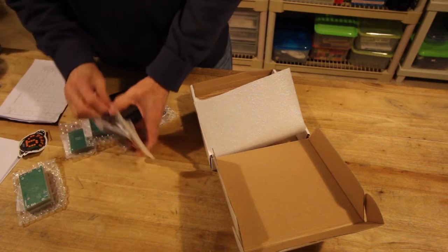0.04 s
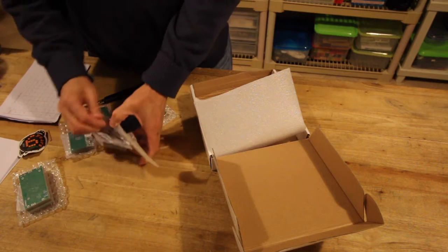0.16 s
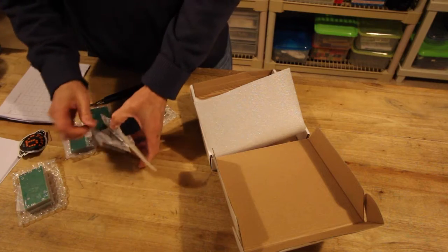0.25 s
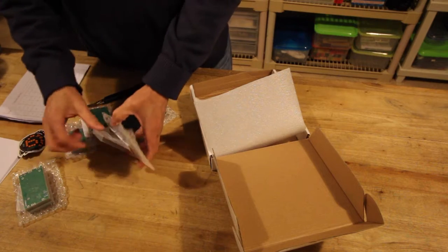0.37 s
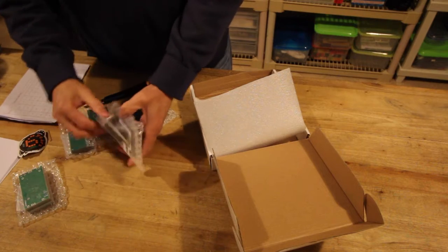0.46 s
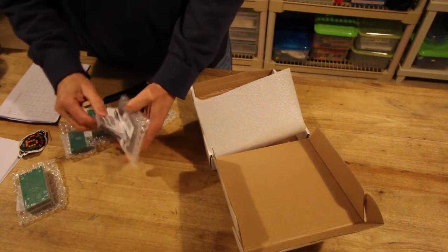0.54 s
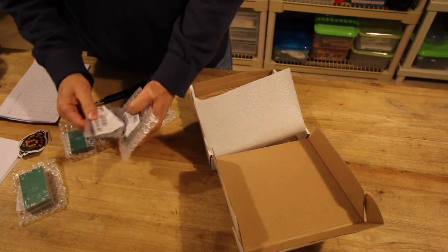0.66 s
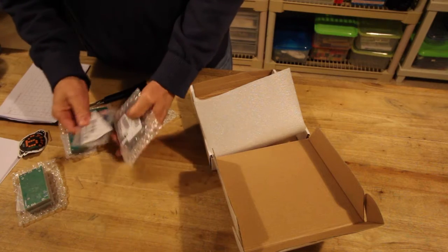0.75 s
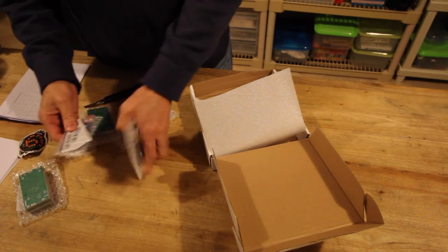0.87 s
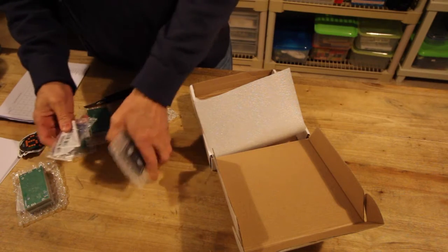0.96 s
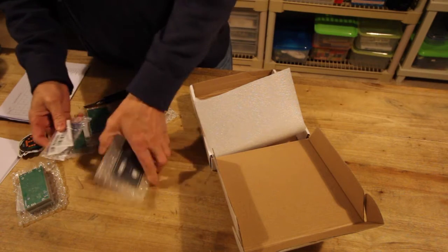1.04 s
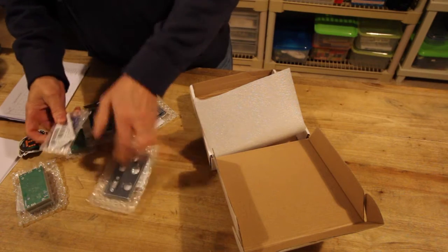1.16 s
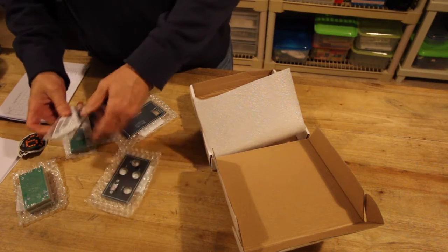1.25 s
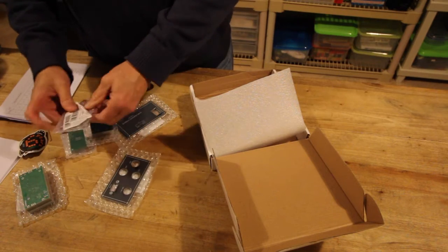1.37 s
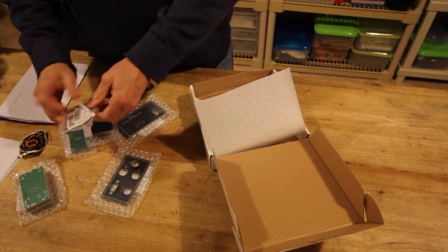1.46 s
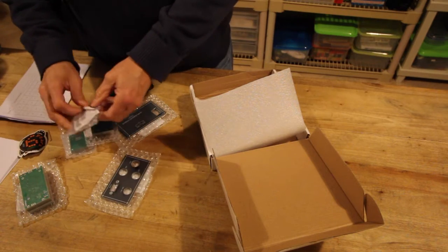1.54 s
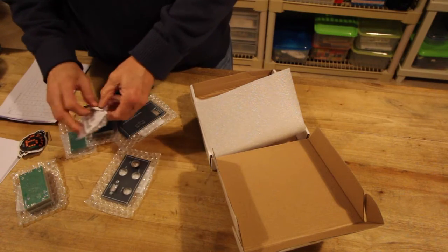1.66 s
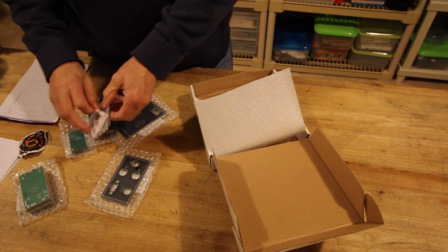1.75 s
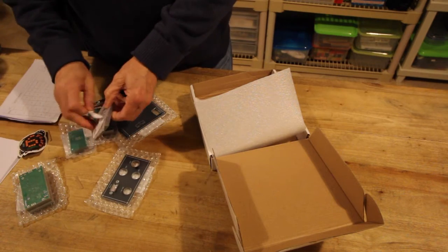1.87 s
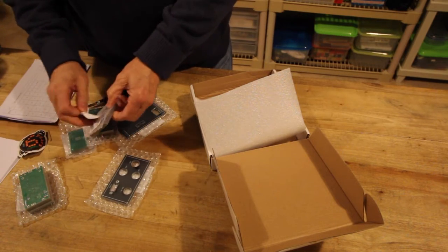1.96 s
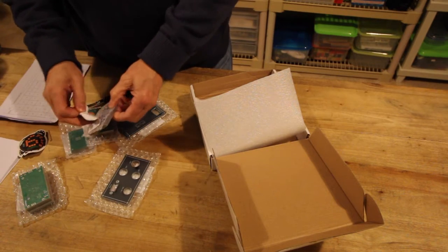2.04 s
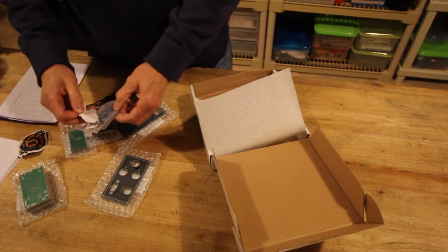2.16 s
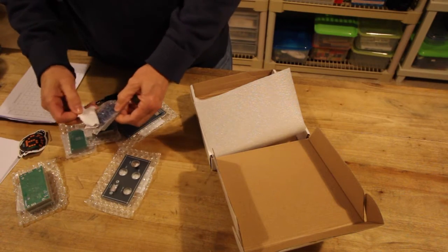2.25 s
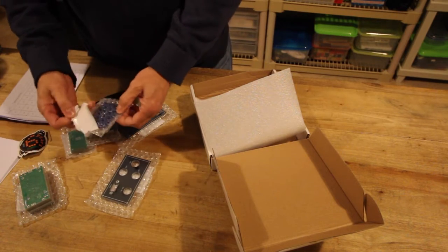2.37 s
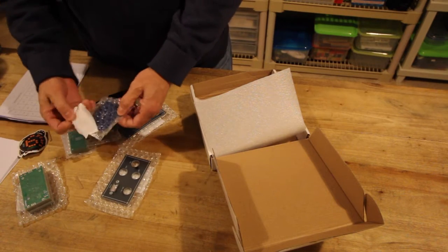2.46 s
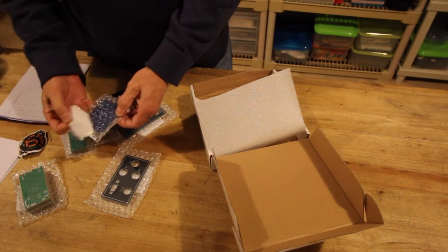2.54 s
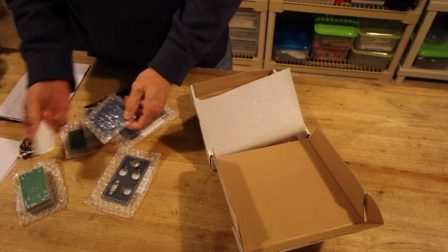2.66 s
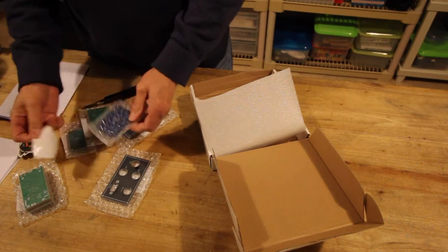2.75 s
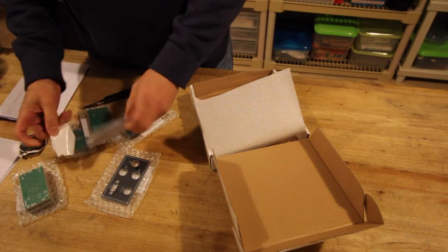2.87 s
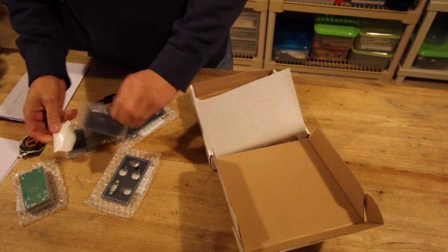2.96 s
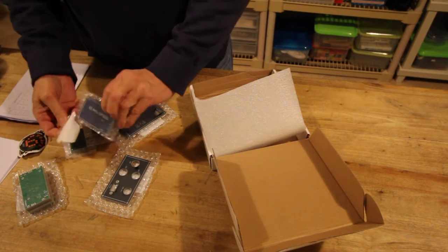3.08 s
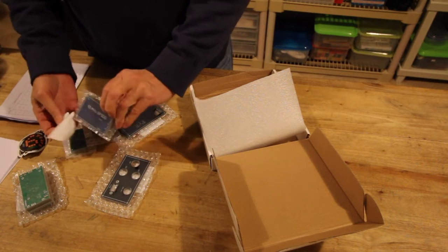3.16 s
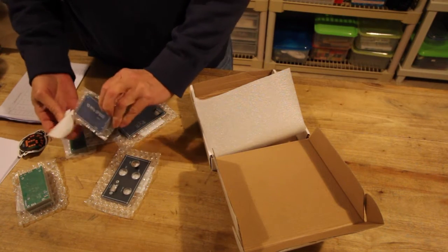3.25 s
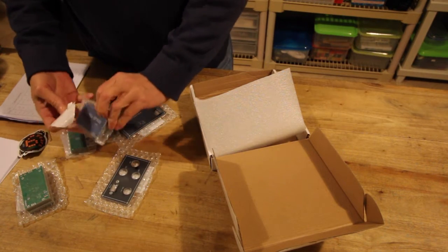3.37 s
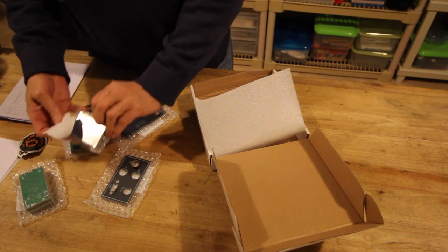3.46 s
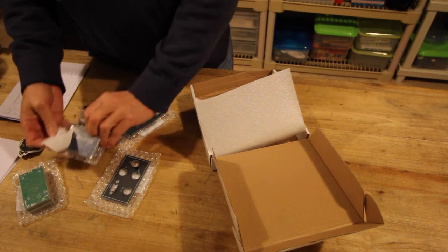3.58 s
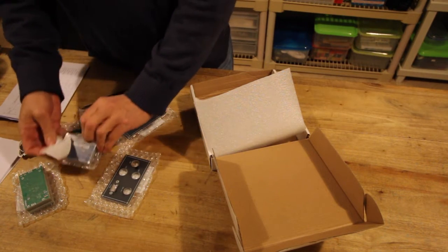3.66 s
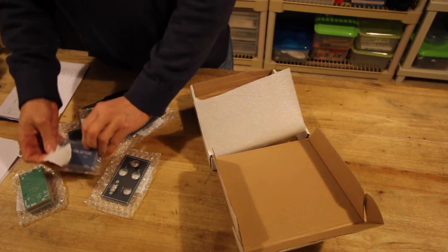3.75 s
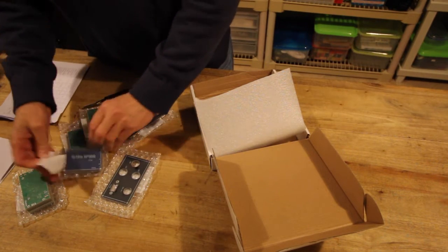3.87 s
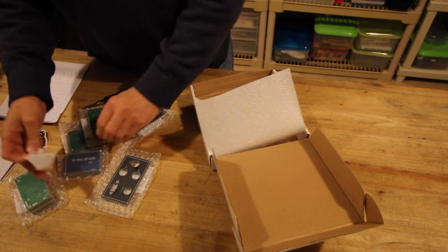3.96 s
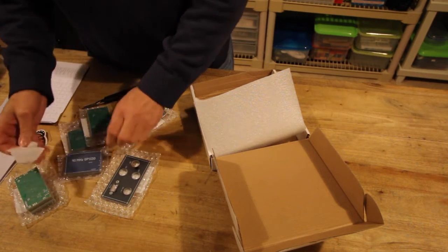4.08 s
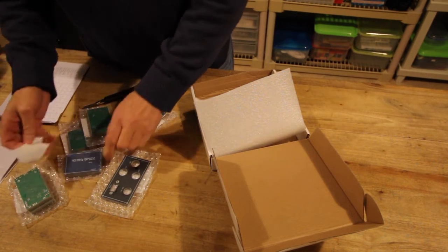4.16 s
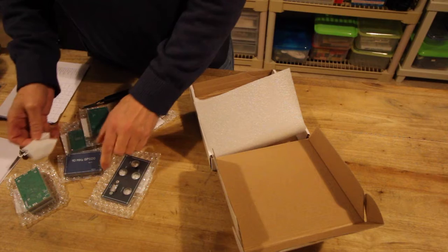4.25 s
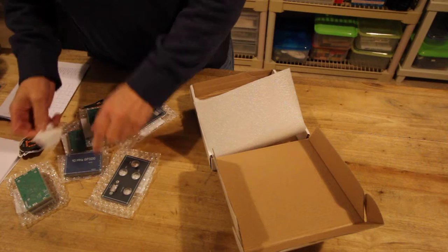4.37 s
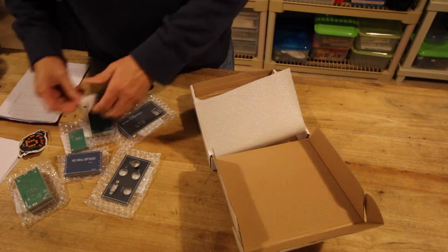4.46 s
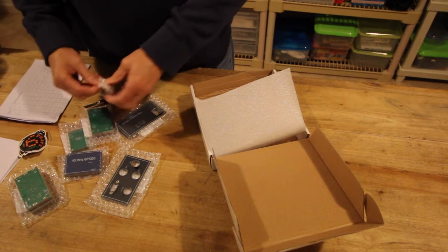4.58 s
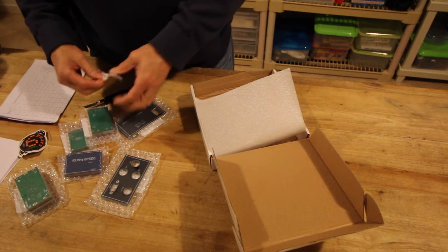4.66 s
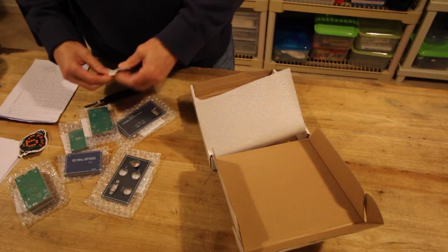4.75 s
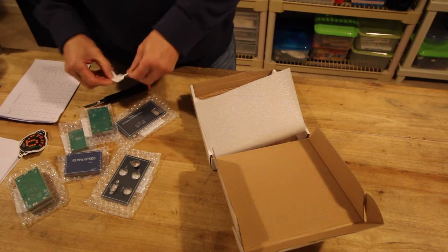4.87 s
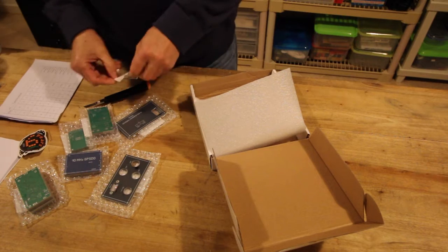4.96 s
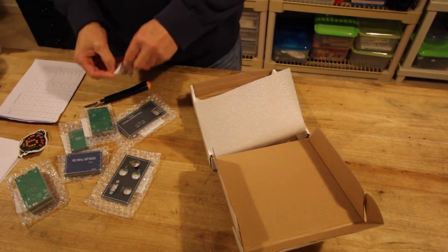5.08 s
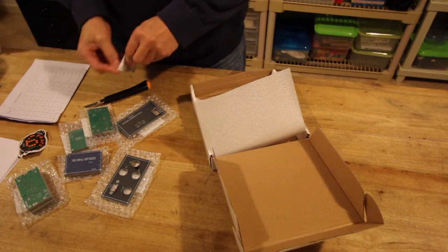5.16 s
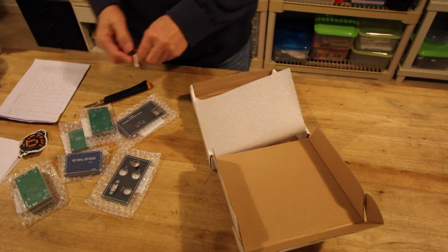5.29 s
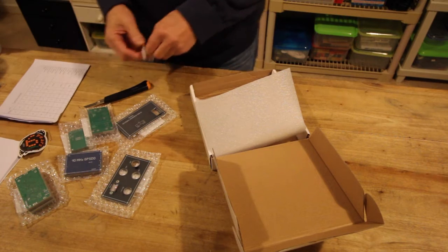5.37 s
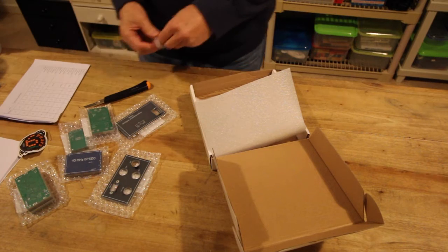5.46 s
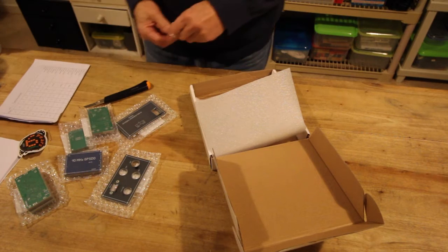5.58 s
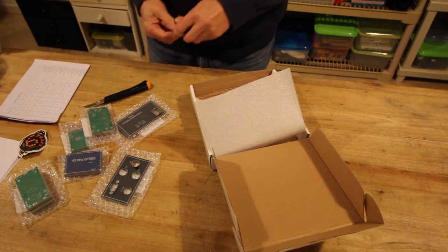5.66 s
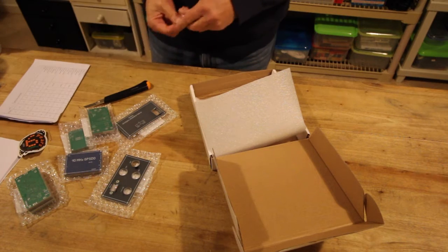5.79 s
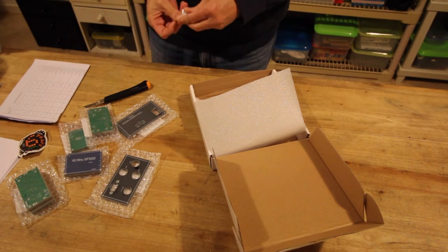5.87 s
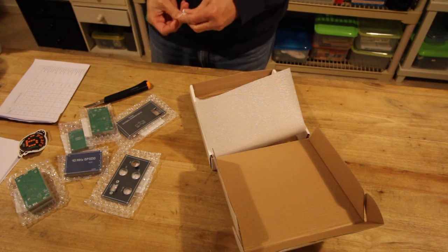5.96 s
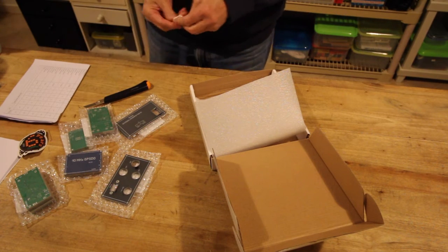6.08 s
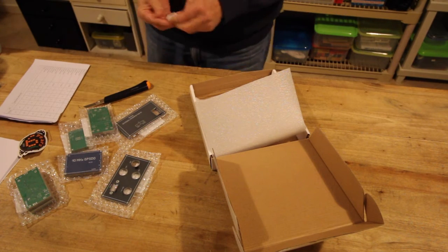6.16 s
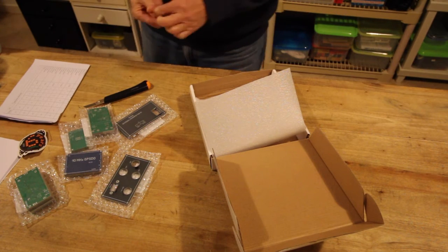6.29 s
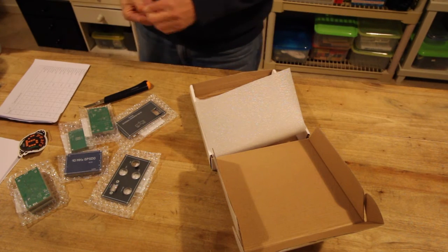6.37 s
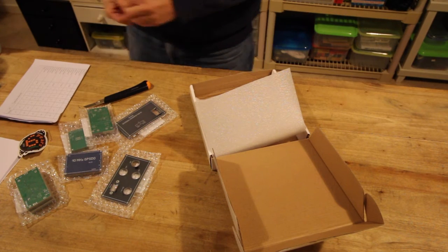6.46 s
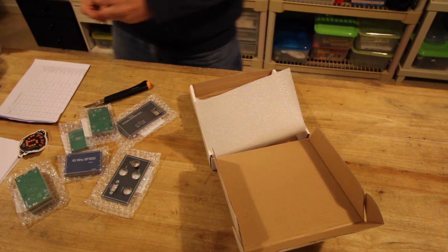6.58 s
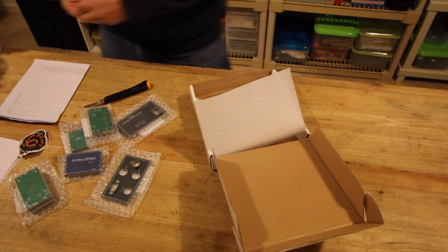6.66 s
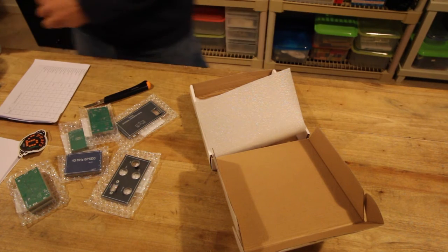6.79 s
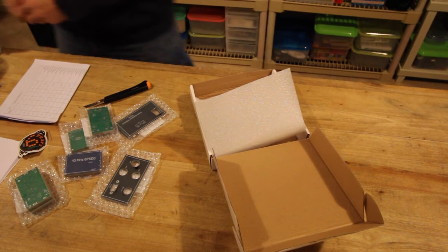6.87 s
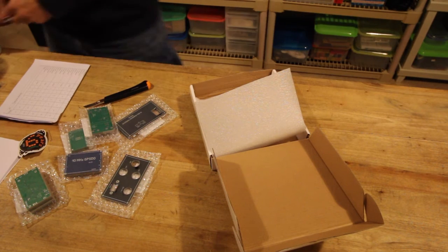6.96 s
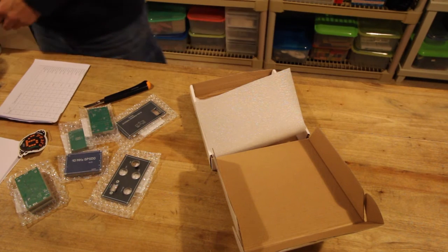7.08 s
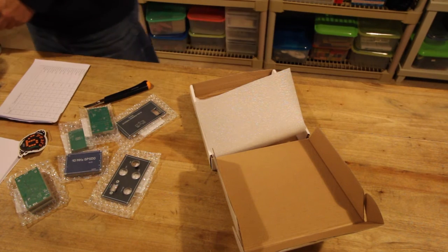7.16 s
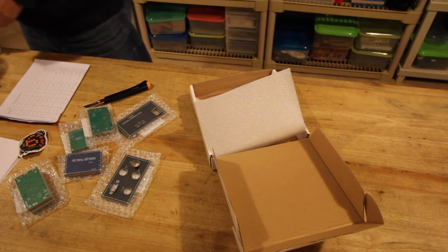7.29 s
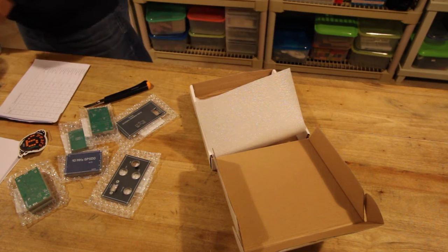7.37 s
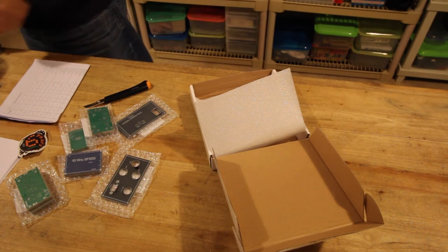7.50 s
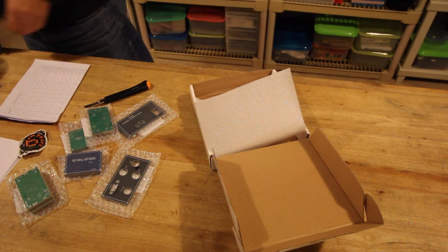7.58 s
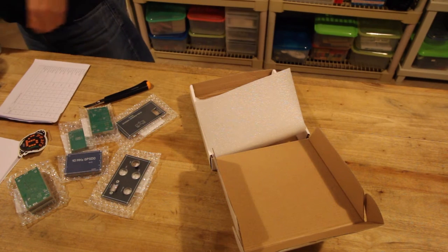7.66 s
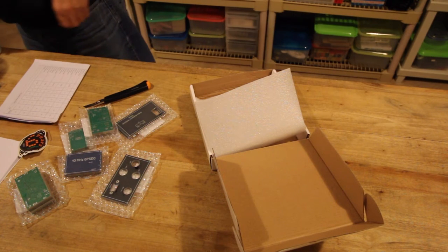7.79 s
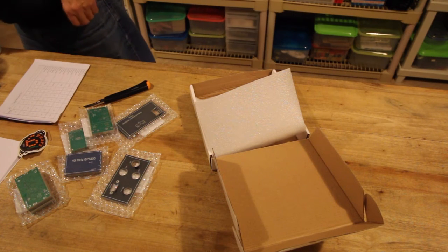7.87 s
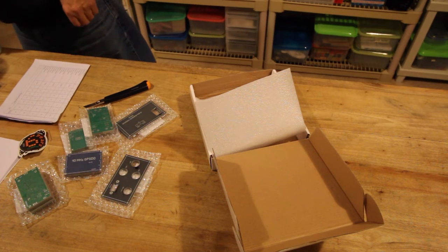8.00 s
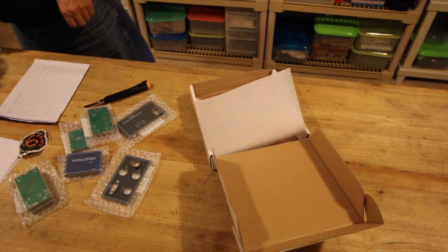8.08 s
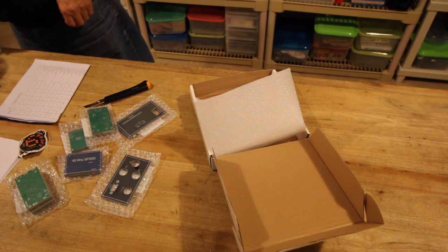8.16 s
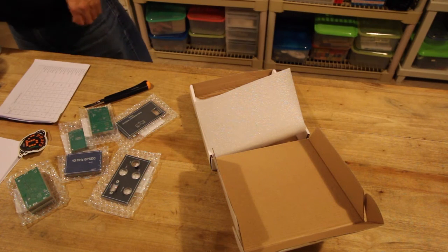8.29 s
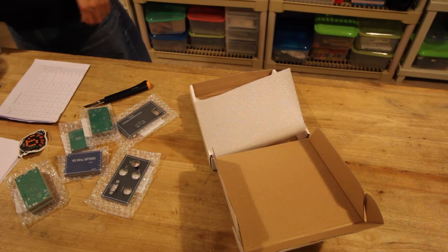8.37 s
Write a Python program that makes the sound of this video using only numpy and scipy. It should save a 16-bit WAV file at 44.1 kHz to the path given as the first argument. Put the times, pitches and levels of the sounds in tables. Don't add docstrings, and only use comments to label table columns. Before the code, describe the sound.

Close to a wooden bench in a small workshop, hands tug at plastic bags with sharp cracks over dense fine crackle, and packets land with soft knocks. A label is then peeled in a loud, rapid run of snaps. Handling lightens to scattered rustles and a gentle set-down, then tiny bright crinkles as film is balled up and carried off. A faint low hum and room tone surface in the quiet.

```python
import sys
import numpy as np
from scipy import signal
from scipy.fft import rfft, irfft, next_fast_len
from scipy.io import wavfile
from scipy.ndimage import map_coordinates

SR = 44100
rng = np.random.default_rng(int(sys.argv[2]) if len(sys.argv) > 2 else 0)


def store_pcm(level_fs):
    pcm = np.round(np.clip(level_fs, -1, 1) * 32767).astype(np.int16)
    wavfile.write(sys.argv[1], SR, np.atleast_2d(pcm).T)


def elevation(decibels):
    levels = np.asarray(decibels, float)
    return 10 ** (levels / 20)


N = 371762


def unit(x):
    return x / np.sqrt(np.mean(x ** 2) + 1e-20)


def along(points, hz):
    f, v = np.transpose(points)
    return np.interp(np.log(hz + 1), np.log(f + 1), v)


def curves(rows, s):
    t, *cols = np.transpose(rows)
    return [np.interp(s, t, c) for c in cols]


def filtered(x, response):
    m = next_fast_len(N + SR // 2)
    hz = np.fft.rfftfreq(m, 1 / SR)
    return irfft(rfft(x, m) * response(hz), m)[..., :N]


def pair(two, alike):
    def mid_side_gain(hz):
        turn = np.arccos(np.clip(along(alike, hz), -1, 1)) / 2
        return np.array([np.cos(turn), np.sin(turn)])
    mid, side = filtered(two, mid_side_gain)
    return np.array([mid + side, mid - side])


def place(s, shapes):
    at = np.round(s * SR).astype(int)[:, None] + np.arange(shapes.shape[1])
    return np.bincount(at.ravel(), shapes.ravel(), N + SR)[:N]


def ring(hz, cycles, size):
    turns = hz[:, None] * np.arange(size) / SR
    return np.sin(2 * np.pi * turns) * np.exp(-turns / cycles) * (1 - np.exp(-2 * turns))


# (frequency [Hz], level per Hz [dB])
AIR_SPECTRUM = [(45, -39), (75, 2), (125, 0), (250, -1.5), (400, -3.5), (800, -9.5), (1250, -11.5),
                (2500, -17), (5000, -18), (8000, -21.5), (13000, -32.5), (16000, -34)]
# (frequency [Hz], likeness [-1..1])
AIR_ALIKE = [(60, 0.5), (180, 0.78), (550, 0.34), (1650, -0.21), (4970, -0.19), (15000, -0.034)]
# (memory [s], threshold [dB], steepness [1])
DUCK = [
    (.03, -21.5, 0.91),
    (.7, -22, 1),
]
MOTOR_HZ, MOTOR_DB = 57, -47.5


def background(loud):
    t = np.arange(N) / SR
    power = np.mean(loud ** 2, axis=0)
    gain = np.ones(N)
    for memory_s, threshold_db, steepness in DUCK:
        share = 1 / (memory_s * SR)
        memory = signal.lfilter([share], [1, share - 1], power)
        gain *= (1 + (memory / elevation(2 * threshold_db)) ** 2) ** (-steepness / 2)
    air = pair(rng.standard_normal((2, N)), AIR_ALIKE)
    air = filtered(air, lambda hz: elevation(along(AIR_SPECTRUM, hz)))
    motor = np.sqrt(2) * np.sin(2 * np.pi * MOTOR_HZ * t)
    return elevation(MOTOR_DB) * gain * (motor + elevation(-2.5) * unit(air))


# (frequency [Hz], T60 [s])
ROOM_T60 = [(200, 0.63), (800, 0.6), (2000, 0.43), (5500, 0.58), (12000, 0.26)]
# (frequency [Hz], likeness [-1..1])
ROOM_ALIKE = [(150, 0.98), (1000, 0.88), (3000, 0.47), (9000, 0.34), (14000, .85)]


def room_tail(x):
    out = np.zeros((2, N + SR))
    step, delay = SR // 3, 300
    for a in range(0, N, step):
        hz, t, z = signal.stft(rng.standard_normal((2, SR * 3 // 5)), SR, nperseg=256)
        decay = elevation(-60 * t / along(ROOM_T60, hz)[:, None])
        tail = signal.istft(z * decay, SR, nperseg=256)[1]
        wet = signal.fftconvolve(x[None, a:a + step], tail / np.linalg.norm(tail[0]), axes=1)
        out[:, a + delay:a + delay + wet.shape[1]] += wet
    return pair(out[:, :N], ROOM_ALIKE)


# (time [s], delay [ms], level [dB])
ECHO = [
    (3, 5.5, -5),
    (5.3, 5.3, -4.5),
    (5.9, 5.0, -2.5),
    (7.1, 4.6, -1),
]


def echo(x):
    n = np.arange(N)
    delay_ms, db = curves(ECHO, n / SR)
    late = np.interp(n - np.round(delay_ms * SR / 1000), n, x)
    rough = rng.standard_normal((2, 40)) * np.exp(-np.arange(40) / 9)
    rough[:, 0] += 6.5
    return elevation(db) * signal.fftconvolve(late[None], rough / np.linalg.norm(rough[0]), axes=1)[:, :N]


# (time [s], peak level [dB], push frequency [Hz])
KNOCKS = [(.241, -24.5, 560), (0.551, -27, 433), (.661, -31, 318), (1.04, -33.5, 495), (1.166, -25, 354),
          (1.198, -23.5, 203), (1.294, -20.5, 220), (1.338, -45, 202), (2.619, -25, 420), (2.656, -39, 430),
          (3.215, -29, 834), (3.311, -30, 405), (3.926, -38, 500), (3.958, -32.5, 180), (4.861, -34, 527),
          (5.056, -38.5, 610), (6.822, -35, 610), (7.249, -47, 150), (8.415, -40, 694)]
# (frequency [Hz], width [Hz], level [dB])
BENCH_MODES = [(122, 81, -6.5), (169, 4.8, 1.5), (199.3, 5.3, -0.5), (287, 140, -7.5), (354, 77, -2.5),
               (459, 23, 1), (776, 190, 2), (1300, 400, -6.5)]


def knocks():
    s, db, hz = np.transpose(KNOCKS)
    blows = place(s, elevation(db + 18.5)[:, None] * ring(hz, 0.57, size=1024))

    def bench(f):
        total = 0
        for k, (mode_hz, width_hz, mode_db) in enumerate(BENCH_MODES):
            loss = 1j * f * width_hz
            total = total + (-1) ** k * elevation(mode_db) * loss / (mode_hz ** 2 - f * f + loss + 1)
        return total
    return filtered(blows, bench)


def radiated(x, low_hz=330, high_hz=14000):
    x = signal.sosfilt(signal.butter(N=2, Wn=low_hz, btype="high", fs=SR, output="sos"), x)
    return signal.sosfilt(signal.butter(N=2, Wn=high_hz, fs=SR, output="sos"), x)


PANELS_HZ = np.array([1300, 3300, 8500])
PANEL_FOLDS_DB = [4, 6]
# (peak time [s], crackle [dB], swell [s], fade [s],
# brightness [dB/octave])
PULLS = [(.1, -43, 0.76, 1, 0.7), (.257, -38, 0.13, 0.11, -5.5), (.551, -33, 0.047, 0.24, -2),
         (.666, -20.5, 0.058, 0.084, -2.5), (0.749, -34, 0.16, 0.17, -3.5),
         (.925, -45.5, 0.41, 0.1, -5), (1.07, -35, 0.2, 0.24, -1.5), (1.165, -20.5, .02, 0.083, -1),
         (1.304, -31.5, .08, 0.19, -3.5), (1.581, -38, 0.13, 0.084, -2.5),
         (1.783, -39.5, 0.57, 0.056, -3), (1.826, -23.5, 0.044, 0.2, 3.5), (1.932, -18, 0.048, 0.06, 0),
         (2.001, -22, 0.037, 0.033, .1), (2.093, -23, 0.33, 0.026, 2), (2.169, -21, 0.055, 0.034, 1.5),
         (2.317, -14.5, 0.061, 0.019, 0.5), (2.415, -26.5, 0.085, 0.07, -2),
         (2.573, -27.5, .012, .025, 6), (2.622, -28, 0.023, 0.047, -4), (2.67, -21, 0.23, 0.016, 1.5),
         (2.7, -34, .03, 0.29, -2),
         (3.1, -53, 0.27, .2, -0.5), (3.174, -41, 0.034, 0.013, -7), (3.223, -29.5, 0.028, 0.028, -6),
               (3.37, -49, 0.2, 0.39, -7), (3.609, -41.5, 0.039, 0.05, 0.5), (3.94, -30, 0.093, .1, -2),
               (4.392, -45, 0.054, 0.02, -2), (4.465, -35.5, 0.012, 0.033, 2.5),
               (4.656, -34.5, 0.046, 0.016, -1.3), (4.75, -53.5, 0.53, 0.9, .1),
               (4.83, -31, 0.021, 0.03, 1), (5.278, -40, 0.12, 0.062, 7), (5.4, -68, 0.9, 0.61, -3),
               (5.62, -39.5, 0.3, 0.22, 0), (5.878, -46.5, 0.1, 0.076, 3.5),
               (6.116, -42, 0.051, 0.033, 9.5), (6.288, -51, .1, 0.13, 9), (6.502, -45.5, 0.075, 0.15, 6),
               (6.67, -52, 0.12, 0.31, 2.5), (6.827, -57, 0.16, 0.21, -11.5), (7.08, -49, 0.11, 0.35, 1),
               (7.26, -46, 0.48, 0.19, 0), (7.5, -75, .45, 0.5, 12), (8.425, -31, 0.032, .1, -0.5)]
SWELL_DB = 25
BOW_DB_PER_OCTAVE = 3.5
SOFT_DB, HARD_DB = -58, -30


def crackle(count):
    u = rng.random((count, 4))
    s = np.sort(u[:, 0]) * N / SR
    hz = 1100 * 12.5 ** u[:, 1]
    peak_s, pull_db, swell_s, fade_s, bright_db = np.transpose(PULLS)
    late_s = s[:, None] - .006 - peak_s
    slope_s = np.abs(np.where(late_s < 0, swell_s, fade_s))
    db = pull_db - SWELL_DB * np.abs(late_s) / slope_s
    octaves = np.clip(np.log2(hz / PANELS_HZ[1]), -1.3, 1.3)[:, None]
    tilt_db = bright_db * octaves - BOW_DB_PER_OCTAVE * np.abs(octaves)
    gain = np.linalg.norm(elevation(db + tilt_db), axis=1)
    hard = np.clip((db.max(axis=1) - SOFT_DB) / (HARD_DB - SOFT_DB), .35, 1)
    for fold_db, panel_hz in zip(PANEL_FOLDS_DB, PANELS_HZ):
        gain *= elevation(hard * fold_db * np.exp(-(np.log(hz / panel_hz) / .15) ** 2))
    clump = map_coordinates(rng.standard_normal(2000), [s * 200])
    size = elevation(hard * (-4.3 * np.log(u[:, 2] + .01) + 4.8 * clump - 11))
    size *= np.sqrt(hz / PANELS_HZ[1])
    size *= np.sign(u[:, 3] - .5)
    return elevation(5.5) * place(s, gain[:, None] * unit(size)[:, None] * ring(hz, 2.5, size=128))


LOW_DB_PER_OCTAVE, HIGH_DB_PER_OCTAVE = 11.5, 26.5


def snap_colour_db(f, hz, large_db, small_db):
    middle = np.clip(hz, 2600, 4500)
    lower, upper = [np.clip(np.log(f / middle) / np.log(p / middle), 0, 1) for p in PANELS_HZ[::2]]
    colour_db = (large_db + 1) * lower + (small_db - 4) * upper
    colour_db -= LOW_DB_PER_OCTAVE * np.log2(np.maximum(1000 / f, 1))
    colour_db -= HIGH_DB_PER_OCTAVE * np.log2(np.maximum(f / np.maximum(8000, 1.78 * hz), 1))
    return colour_db + 7.5 * np.exp(-(np.log(f / hz) / .26) ** 2)


# (time [s], peak level [dB], pitch [Hz])
BAG_SNAPS = [(0.0568, -27, 4200), (.0906, -25, 4420), (.109, -29, 3220), (0.154, -26.5, 3770),
             (.2429, -14.5, 1170), (0.2525, -23, 1270), (0.341, -27, 5600), (0.3907, -48.5, 2120),
             (0.4209, -24.5, 3070), (.4973, -30, 3550), (0.542, 2, 2860), (.5475, -22, 3700),
             (.5503, -5, 1890), (0.5872, -3.5, 2480), (0.59, -6.5, 2560), (.6032, -18.5, 2670),
             (0.911, -23, 3360), (0.9818, -32, 4070), (1.021, -28, 3900), (1.0985, -25.5, 1510),
             (1.131, -24.5, 4070), (1.1651, -10, 1300), (1.2197, -15.5, 1440), (1.2779, -13, 1780),
             (1.2967, -13.5, 1310), (1.343, -19, 1890), (1.4428, -26.5, 4430), (1.5352, -23.5, 1250),
             (1.7167, -56, 3530)]
# (time [s], peak level [dB], pitch [Hz])
PEEL_SNAPS = [(1.7985, -14, 5390), (1.829, 0.5, 2560), (1.8439, -8, 2650), (1.8545, -14, 2670),
              (1.8726, -3.5, 2490), (1.8894, -6.5, 2620), (1.9005, -7, 2750), (1.9271, -9.5, 3260),
              (1.9594, -10, 3480), (1.9679, -13, 3540), (1.9992, -4, 3030), (2.0091, -21, 2950),
              (2.1016, -7, 3150), (2.1268, -11.5, 5900), (2.1642, -2.5, 3440), (2.1731, -19.5, 1450),
              (2.2218, -7, 5000), (2.27, -6, 3950), (2.288, -6, 3230), (2.3009, -6.5, 2800),
              (2.3177, -4, 3260), (2.3333, -15, 3280), (2.3503, -22, 3440), (2.5174, -23, 2480),
              (2.5714, -2, 2500), (2.619, -20, 2500), (2.6243, -5.5, 4310), (2.6282, -2.5, 3100),
              (2.6574, -19.5, 3830), (2.656, -11, 950)]
# (time [s], peak level [dB], pitch [Hz])
PART_SNAPS = [(2.8788, -23, 3600), (2.9592, -26.5, 3840), (3.0256, -24, 1670), (3.1738, -24, 1300),
              (3.2798, -32, 5130), (3.311, -7, 2560), (3.3665, -14, 2810), (3.6017, -29.5, 4950),
              (3.8941, -24.5, 2000), (3.9252, -17, 1410), (4.4681, -25, 3400), (4.6066, -29, 1300),
              (4.6278, -33, 3620), (4.6547, -19, 3850), (4.6548, -21.5, 3440), (4.7347, -26, 2840),
              (4.815, -30, 3900), (4.8314, -22, 3000), (4.835, -14.5, 3800), (4.8567, -64, 3380),
              (4.991, -32, 3200)]
# (time [s], peak level [dB], pitch [Hz])
BALL_SNAPS = [(5.2522, -25, 5000), (5.2708, -14, 2700), (5.4337, -26.5, 6800), (5.484, -22, 8300),
              (5.5885, -30, 1700), (5.6123, -21, 2600), (5.6249, -16, 4090), (5.6504, -11.5, 4160),
              (5.8016, -23.5, 7350), (5.8663, -28, 5120), (5.8812, -25, 7600), (6.045, -23, 7640),
              (6.0755, -22, 8100), (6.1156, -26, 5970), (6.274, -37, 4910), (6.2855, -17, 5600),
              (6.4764, -29, 6680), (6.495, -34, 3800), (6.6675, -28.5, 7700), (6.821, -37, 1000),
              (6.9542, -35.5, 5100), (7.033, -31, 8500), (7.0919, -26, 5740), (7.192, -33, 7150),
              (7.2694, -30, 2300), (7.4137, -37.5, 5700), (7.6841, -46, 7000)]
# (large panel level [dB], small panel level [dB])
FILMS = [
    (-7, -0.5),
    (-10, 0),
    (-5, 1),
    (-10.5, -1),
]
LARGE_DB_PER_OCTAVE, SMALL_DB_PER_OCTAVE = 13.5, 2
PANEL_SCATTER_DB = 2.5


def snaps():
    tables = BAG_SNAPS, PEEL_SNAPS, PART_SNAPS, BALL_SNAPS
    s, db, hz = np.vstack(tables).T
    film_db = np.repeat(FILMS, [len(rows) for rows in tables], axis=0)
    film_db = film_db + PANEL_SCATTER_DB * rng.standard_normal((len(s), 2))
    large_db = film_db[:, 0] + LARGE_DB_PER_OCTAVE * np.clip(np.log2(2600 / hz), 0, 1)
    small_db = film_db[:, 1] + SMALL_DB_PER_OCTAVE * np.log2(hz / 3500)
    size, lead = 512, 16
    n = np.arange(size)
    f = np.fft.rfftfreq(size, 1 / SR) + 1
    colour_db = snap_colour_db(f, hz[:, None], large_db[:, None], small_db[:, None])
    burst = rfft(rng.standard_normal((len(s), size)) * np.exp(-n / SR / .001))
    burst = burst / np.sqrt(np.abs(burst))
    shape = irfft(elevation(colour_db) * burst * np.exp(-2j * np.pi * f * lead / SR))
    shape *= np.clip(n / lead, 0, 1) ** 2 * np.exp(-n / SR / .003)
    peak = np.abs(shape).max(axis=1)
    return place(s - lead / SR, shape * (elevation(db + 2) / peak)[:, None])


# (frequency [Hz], level [dB])
LEAN = [(250, -1.5), (1200, -.3), (4000, 1.7), (12000, .8)]


def scene():
    film = radiated(snaps() + crackle(count=30000))
    wood = knocks()
    side = np.array([[1], [-1]])

    def lean(hz):
        return elevation(side * along(LEAN, hz) / 2) * np.exp(1j * side * hz * 6e-5)
    near = filtered(film + wood, lean)
    bench = near + echo(film) + room_tail(elevation(-1.5) * film + elevation(-0.5) * wood)
    return bench + background(bench)


def roll_off(x):
    return signal.sosfilt(signal.butter(12, 15900, fs=SR, output="sos"), x)


def record(dry):
    held = dry / (1 + np.abs(dry / 1.02) ** 8) ** (1 / 8)
    return roll_off(held)


dry = scene()
out = record(dry)
store_pcm(out)
```